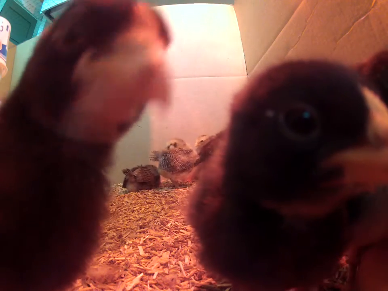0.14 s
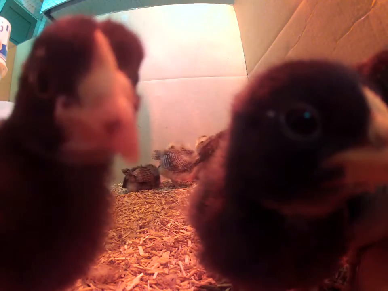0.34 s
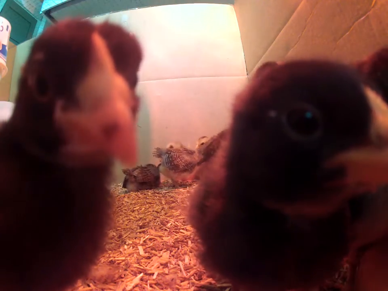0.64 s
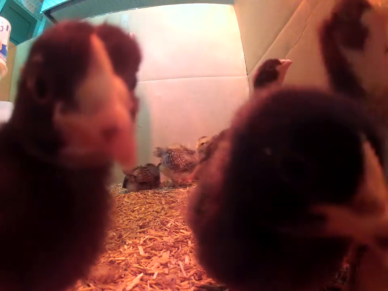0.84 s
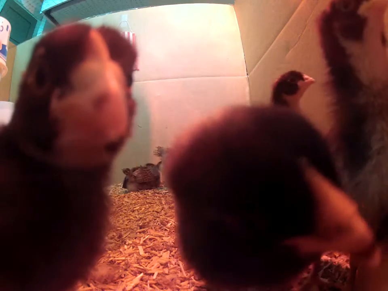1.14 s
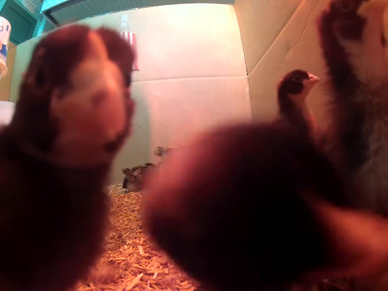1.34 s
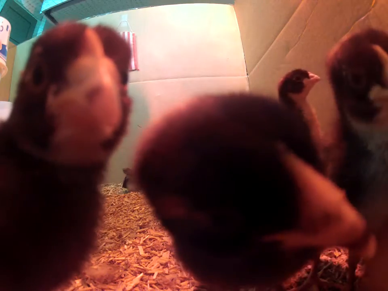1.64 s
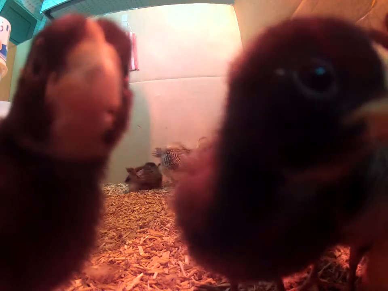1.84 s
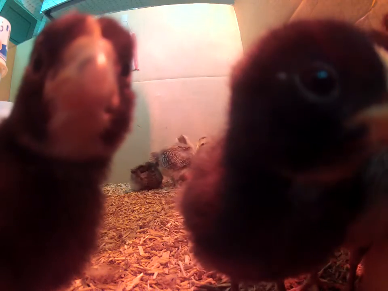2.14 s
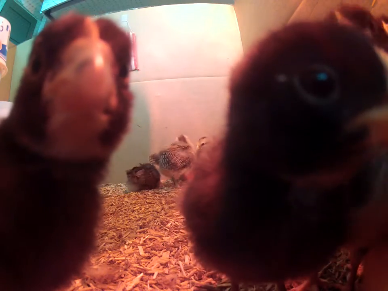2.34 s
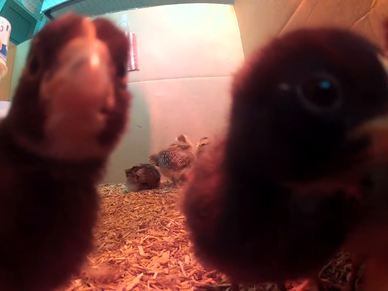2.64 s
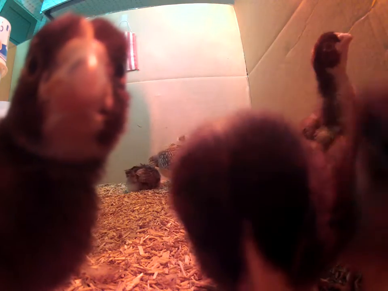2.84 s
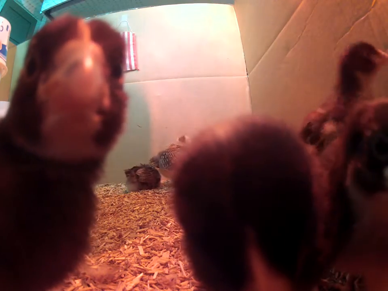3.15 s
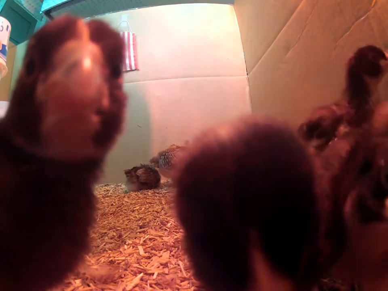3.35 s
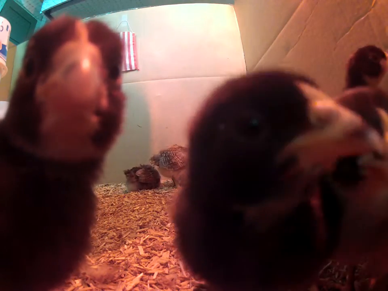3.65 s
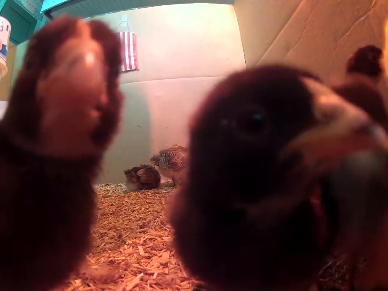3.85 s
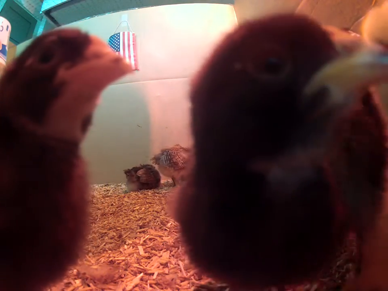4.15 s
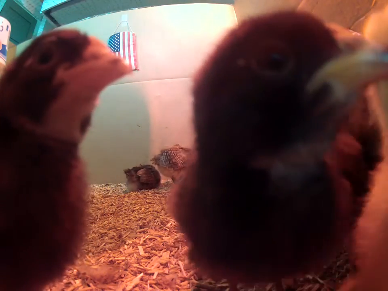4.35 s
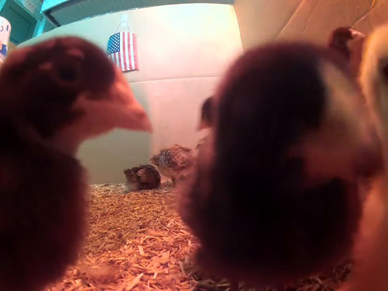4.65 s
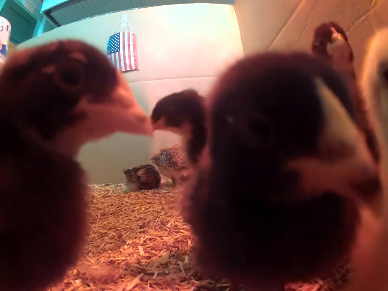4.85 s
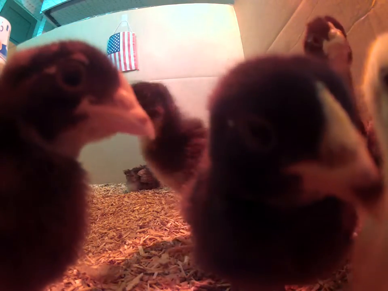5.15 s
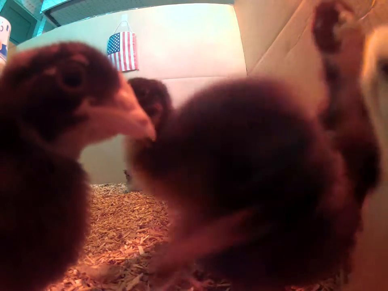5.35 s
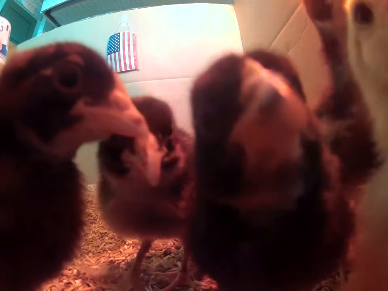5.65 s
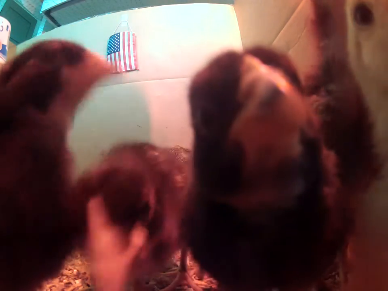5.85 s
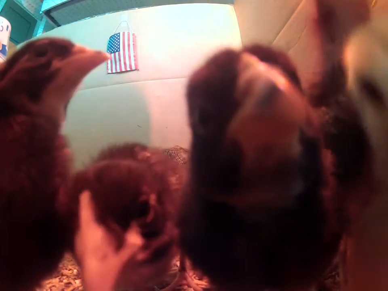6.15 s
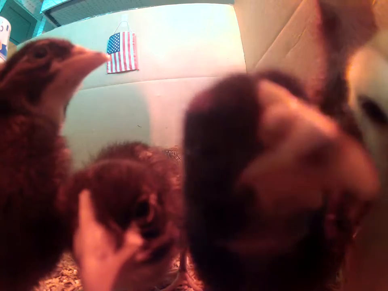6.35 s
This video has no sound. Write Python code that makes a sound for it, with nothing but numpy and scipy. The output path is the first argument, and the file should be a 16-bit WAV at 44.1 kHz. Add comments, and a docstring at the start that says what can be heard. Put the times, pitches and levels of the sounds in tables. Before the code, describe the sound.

Inside a cardboard brooder, young chicks peep beside a small camera whose low-grade microphone adds a gritty, metallic treble edge. Over a quiet low rumble and faint hiss, brief whistled cheeps of about a twentieth of a second rise or dip and then fall, with a short diffuse box echo. Soft scattered peeps open the first second. At 1.15 and 1.4 seconds beaks rap the casing: loud, hard, stuttering clicks with a hollow knock and low wobble, and a duller bump between at 1.3. After a lull, pecks return at 2.45, 2.93, 3.34 and, brightest, 3.6 seconds, among cheeps. From 3.7 to 4.7 the peeping thickens into a quick, overlapping flurry. It then quiets until sparse cheeps from 5.3, a faint tap near 5.55, and a tight cluster at 5.75 to 5.9, the last clearest. Light scuffling in shavings follows, then one weak peep at 6.4.

```python
"""Chicks crowding a camera in a brooder box

Young chicks in a cardboard box peep close to a small camera: near-sine whistles with a faint octave,
gliding through a turn in pitch. Beaks rap the case, ringing its resonances; shoves bump and wobble it.
Feet scuffle as bursts of grainy noise, noise echoes give the box, and a low room rumble lies beneath.
The camera samples at a low rate and holds each sample, so every sound has mirror images in the treble.
"""
import sys
import numpy as np
from scipy import signal
from scipy.fft import rfft, irfft
from scipy.io import wavfile
from scipy.ndimage import uniform_filter1d

SR = 44100
rng = np.random.default_rng(int(sys.argv[2]) if len(sys.argv) > 2 else 0)


def to_wav(sig):
    """Store sig (one row per channel, or 1-D mono) as 16-bit WAV at the path in sys.argv[1].

    Samples outside -1..1 are clipped; the rate is SR.
    """
    pcm = np.clip(np.atleast_2d(sig), -1, 1) * 32767
    pcm = np.round(pcm).astype(np.int16)
    wavfile.write(sys.argv[1], SR, pcm.T)  # frames by channels


N = 286650


def undb(db):
    """Turn decibels into an amplitude factor."""
    return 10 ** (np.asarray(db) / 20)


def peeps():
    """Near-sine whistles with a faint octave; returns the direct sound and the feed to the box."""
    # Chick calls. Each row: start in seconds, length in seconds, first pitch in Hz, share of the length
    # at which the glide turns, pitch at the turn in Hz, last pitch in Hz, level in dB,
    # growth from start to end in dB, box echo in dB relative to the call.
    calls = [(0.141, 0.046, 2920, 0.38, 3268, 2810, -42, 7, -10.5),
             (0.302, 0.042, 3260, 0.44, 3493, 2770, -44, 6, -9.5),
             (0.558, 0.034, 2750, 0.66, 2580, 2440, -71, -8, -18),
             (0.726, .027, 2800, 0.4, 2650, 2680, -74.5, -14, -12),
             (0.853, .048, 3540, 0.22, 4020, 2700, -50.5, 6, -5),
             (1.009, 0.036, 3630, 0.25, 3934, 2720, -49, 6, -7),
             (1.342, 0.063, 3170, 0.51, 2600, 2560, -59.5, -10, -12),
             (1.473, 0.04, 3080, 0.79, 2710, 2730, -48.5, 4, 1),
             (1.507, 0.035, 2950, 0.34, 3200, 2800, -58, -2, -17),
             (1.643, 0.051, 3146, 0.58, 2746, 2790, -46, 10, -12),
             (2.25, 0.048, 3088, 0.59, 2640, 2790, -54.5, 0, -6.5),
             (2.447, 0.048, 2930, 0.39, 3274, 2650, -38.5, -2.5, -13),
             (2.572, 0.053, 3220, 0.38, 3800, 2760, -42, 16, -10.5),
             (2.671, 0.043, 3830, 0.24, 3740, 2566, -50, 18.5, -7.5),
             (2.809, 0.057, 3570, 0.18, 4750, 2714, -51.5, 13.5, -4),
             (3.049, 0.056, 3245, 0.26, 4450, 2690, -50, 13.5, -3.5),
             (3.14, 0.043, 2910, 0.23, 2910, 2436, -54.5, -12, -7),
             (3.554, .038, 3166, 0.79, 2810, 2590, -44.5, -11.5, -19),
             (3.688, 0.066, 3186, 0.64, 2794, 3150, -38, -5.5, -13.5),
             (3.845, 0.058, 3213, 0.56, 2893, 3140, -42.5, 0, -11),
             (3.906, 0.052, 3080, 0.35, 3566, 2670, -46, 6.5, -11.5),
             (3.969, 0.048, 3380, 0.35, 4780, 2670, -47.5, -3, 1),
             (4.075, 0.027, 3100, 0.15, 3180, 2550, -51, 4.5, -9),
             (4.089, 0.052, 3800, 0.21, 4680, 2770, -47, -10, -4),
             (4.239, 0.041, 2790, 0.239, 3003, 2430, -49.5, -5, -5),
             (4.254, .072, 3615, 0.22, 4940, 2820, -46.5, -5, -3),
             (4.41, 0.064, 4750, 0.22, 5290, 2780, -53, -10, -4.5),
             (4.488, 0.062, 3170, 0.72, 2737, 2860, -42.5, -4.5, -16.5),
             (4.661, 0.057, 3120, 0.65, 2933, 2950, -45, 3, -15.5),
             (5.291, .048, 3240, .15, 3250, 2750, -60.5, 3, -1),
             (5.45, 0.039, 3464, 0.91, 3240, 3220, -57, -16, -1.5),
             (5.732, 0.058, 2950, 0.74, 2614, 2880, -49.5, -6, -16.5),
             (5.744, 0.048, 3310, .3, 3410, 2640, -46, -11.5, -10),
             (5.757, 0.062, 3545, .24, 3810, 3004, -41.5, -1, -8.5),
             (5.906, 0.068, 4000, 0.11, 3928, 3434, -35.5, -2.5, -14),
             (5.914, 0.051, 3210, 0.25, 3626, 2710, -44, -14, -11),
             (6.39, 0.05, 3420, .7, 3170, 3100, -59.5, -13, -5.5)]
    # A dip on the way to the microphone. Each row: pitch in Hz, gain in dB.
    whistle_colour = [(2500, 0.5), (3500, -1.5), (3850, -4), (4200, -19), (4700, -16.5), (5300, -14)]
    colour_hz, colour_db = np.transpose(whistle_colour)
    falter_db_per_khz, falter_at, falter_width = 1.5, 0.58, 0.13  # place and width in shares of the length
    arch_swell_db, sag_swell_db = 2.5, 7  # softening at both ends, stronger if the pitch sags
    attack_s, release_s = 0.0048, 0.0075
    octave_db, octave_db_per_khz = -26, -45  # steady octave up to a pitch of 2.75 kHz, and its slope above
    steady_hz_per_s = 13000  # the octave fades in glides faster than this
    muffle_share = 0.2  # part of a peep's level changes that the box hears; the rest is the bird's direction

    direct, feed = np.zeros(N), np.zeros(N)
    for start, length, first_hz, turn, turn_hz, last_hz, level_db, growth_db, echo_db in calls:
        i, u = int(start * SR), np.linspace(0, 1, int(length * SR))
        hz = glide(u, first_hz, turn, turn_hz, last_hz)

        # The voice falters past the top of a high arch.
        fall_khz = max(turn_hz - last_hz, 0) / 1000
        falter_db = falter_db_per_khz * fall_khz * np.exp(-((u - falter_at) / falter_width) ** 2)
        swell_db = arch_swell_db if turn_hz > first_hz else sag_swell_db
        db = level_db + growth_db * (u - 0.5) - swell_db * (2 * u - 1) ** 2 - falter_db
        edge = np.clip(np.minimum(u * length / attack_s, (1 - u) * length / release_s), 0, 1)

        phase = 2 * np.pi * np.cumsum(hz) / SR
        octave = undb(octave_db + octave_db_per_khz * np.maximum(hz / 1000 - 2.75, 0))
        octave /= 1 + (np.gradient(hz) * SR / steady_hz_per_s) ** 4
        whistle = np.sin(phase) + octave * np.sin(2 * phase)
        call = undb(np.interp(hz, colour_hz, colour_db)) * edge * whistle

        box_db = db.max() + muffle_share * (db - db.max()) + echo_db
        direct[i:i + len(u)] += call * undb(db)
        feed[i:i + len(u)] += call * undb(box_db)
    return direct, feed


def glide(u, first_hz, turn, turn_hz, last_hz):
    """Pitch eases into the turn and out of it again along arcs of a cosine."""
    # Radians of cosine before and after the turn; a deeper fall levels out more.
    onset_bend = 1.8
    close_bend = 0.51 + 0.9 * max(turn_hz - last_hz, 0) / 1000

    def arc(v, bend):
        """Cosine arc from 0 at the turn to 1 at the far end."""
        return (1 - np.cos(bend * v)) / (1 - np.cos(bend))

    before = (first_hz - turn_hz) * arc((turn - u) / turn, onset_bend)
    after = (last_hz - turn_hz) * arc((u - turn) / (1 - turn), close_bend)
    return turn_hz + np.where(u < turn, before, after)


def beak_taps():
    """A hard contact rings the shell in high ticks and lower knocks, and loose parts rattle."""
    # Beak contacts, first blows and rattling rebounds.
    # Each row: time in seconds, tick drive in relative dB, knock drive in relative dB.
    contacts = [(1.12, -58.5, -52.5), (1.1437, -16, -19.5), (1.1445, -3, -19), (1.1465, -10, -11),
                (1.1487, -23, -27), (1.2938, -52.5, -37), (1.2973, -64.5, -34), (1.4072, -4.5, -19.5),
                (1.408, -7, -14), (1.4098, -10.5, -21.5), (1.4162, -22, -22.5), (1.4184, -14.5, -25),
                (1.4207, -8.5, -16.5), (1.4225, -18, -31), (2.436, -10, -28), (2.4389, -15, -33.5),
                (2.4396, -17, -26.5), (2.4417, -19, -35), (2.4437, -20.5, -25), (2.4482, -31.5, -29),
                (2.929, -19, -38), (2.9325, -12.5, -17.5), (2.935, -26, -24), (2.9387, -21.5, -38),
                (2.9415, -10.5, -30), (2.951, -53, -45), (3.3385, -13, -24.5), (3.3412, -22.5, -22),
                (3.3434, -18, -33.5), (3.3497, -18, -35.5), (3.354, -34.5, -44), (3.5846, -14.5, -27),
                (3.5932, -31, -41), (3.5968, -2, -36.5), (3.5982, -5.5, -32.5), (4.387, -59, -75),
                (5.46, -53, -54), (5.5546, -33.5, -41.5), (5.883, -43.5, -49), (5.973, -52, -70),
                (6.132, -72, -55)]
    # Bright resonances of the case. Each row: frequency in Hz, relative level in dB, 60 dB decay in seconds.
    tick_modes = [(2550, -6, .009), (3015, -8, .008), (3630, -7, .012), (4250, -6, .010), (4700, 2, .006),
                  (5250, 0, .007)]
    # Duller resonances of the case. Each row: frequency in Hz, relative level in dB, 60 dB decay in seconds.
    knock_modes = [(645, -7, 0.018), (776, 0.5, .02), (1031.4, 5, 0.013), (1478, 3.5, 0.012),
                   (2400, -5.5, 0.0014)]
    contact_s, rattle_s = 0.0004, 0.004  # time constants of exponential decay
    scratch_share = 0.4  # random scratch in a contact, beside the clean first touch
    rattle_db = -11  # relative to the tick drive
    soft_samples_per_db = 1.1  # a contact with little tick is a soft one and its knock lasts longer

    t = np.arange(2048) / SR
    tick, knock, rattle = np.zeros((3, N))
    noises = rng.standard_normal((len(contacts), 2, len(t)))
    for (s, tick_db, knock_db), (hard, loose) in zip(contacts, noises):
        at = slice(int(s * SR), int(s * SR) + len(t))
        blow = hard * np.exp(-t / contact_s)
        blow *= scratch_share / np.sqrt(np.sum(blow ** 2))
        blow[0] += 1  # the clean first touch
        tick[at] += undb(tick_db) * blow

        soft = max(1, int(soft_samples_per_db * (knock_db - tick_db)))
        soft_blow = uniform_filter1d(blow, soft, origin=-(soft // 2), mode="constant") * np.sqrt(soft)
        knock[at] += undb(knock_db) * soft_blow
        rattle[at] += undb(tick_db + rattle_db) * loose * np.exp(-t / rattle_s)
    rattle = signal.sosfilt(signal.butter(2, 1500, "high", fs=SR, output="sos"), rattle)
    return undb(-3.5) * ring(tick, tick_modes) + undb(-10.5) * ring(knock, knock_modes) + rattle


def jolts():
    """Each shove bumps the whole camera and leaves it wobbling on its footing."""
    # Shoves at the camera. Each row: time in seconds, bump drive in relative dB, wobble drive in relative dB.
    shoves = [(1.117, -45, -61), (1.145, -31, -30.5), (1.2923, -32, -38.5), (1.408, -31, -40),
              (1.4202, -30, -34), (2.4357, -26.5, -40.5), (2.4431, -25.5, -33), (2.9334, -44, -38.5),
              (2.942, -47.5, -43.5), (3.3403, -53.5, -36), (3.3444, -34.5, -42), (3.5836, -52.5, -32),
              (3.5934, -23, -43), (3.5981, -21, -31), (5.5543, -52, -68), (5.743, -45, -73),
              (5.971, -47, -86), (6.054, -43, -73.5)]
    # Bump resonances. Each row: frequency in Hz, relative level in dB, 60 dB decay in seconds.
    bump_modes = [(178, -0.5, 0.013), (316.3, -4, 0.04), (530, -8, 0.061)]
    # Wobble resonances. Each row: frequency in Hz, relative level in dB, 60 dB decay in seconds.
    wobble_modes = [(75.94, -5, 0.13), (150.45, -3.5, 0.096), (98.4, -2.5, .25), (236, -8, 0.09)]
    push_s, shake_s = 0.00048, 0.02  # time constants of the push and of the shaking

    t = np.arange(2048) / SR
    push = t * np.exp(-t / push_s)
    push /= push.sum()
    bump, wobble = np.zeros((2, N))
    shakes = rng.standard_normal((len(shoves), len(t))) * np.exp(-t / shake_s)
    for (s, bump_db, wobble_db), shake in zip(shoves, shakes):
        at = slice(int(s * SR), int(s * SR) + len(t))
        bump[at] -= undb(bump_db) * push
        wobble[at] += undb(wobble_db) * (push + 0.37 * shake / np.sqrt(np.sum(shake ** 2)))
    wobble_band = signal.butter(2, [45, 500], "band", fs=SR, output="sos")
    swaying = signal.sosfilt(wobble_band, ring(wobble, wobble_modes))
    return undb(3.5) * ring(bump, bump_modes) + undb(-2) * swaying


def ring(x, modes):
    """Sum of decaying resonances, neighbours in opposite phase."""
    out = 0
    for k, (hz, db, t60) in enumerate(modes):
        pole = np.exp(2j * np.pi * hz / SR - np.log(1000) / (t60 * SR))
        resonance = signal.lfilter([1], [1, -pole], x).imag
        out = out + (-1) ** k * undb(db) * resonance
    return out


def box(x):
    """Diffuse echoes off the box walls: a strong early part, then a dense fading tail; unit energy."""
    box_t60_s = 0.49
    t = np.arange(int(SR * 0.8)) / SR
    tail = rng.standard_normal(len(t)) * np.exp(-np.log(1000) * t / box_t60_s)
    tail *= np.minimum(t / 0.0051, 1) * (1 + 1.3 * np.exp(-t / 0.028))
    return signal.fftconvolve(x, tail / np.sqrt(np.sum(tail ** 2)))[:N]


def scuffle():
    """Dense tiny crackles of dry shavings in uneven bursts, and the duller shifting of feet."""
    # Feet and down in the shavings.
    # Each row: start in seconds, hold in seconds, level in dB, fading in dB per second.
    shavings = [(1.12, .02, -61, 302.5), (1.15, .01, -65.5, 148.5), (1.43, .15, -71.5, 110),
                (2.95, 0.011, -55, 600.5), (3.35, 0.38, -74.5, 204.5), (3.553, 0.028, -59, 297.5),
                (3.6, .01, -53.5, 200), (3.7, 0.074, -73, 300), (4.39, 0.13, -68, 168), (5.3, .2, -82, 200),
                (5.555, .01, -54.5, 172.5), (5.7, 0.26, -72, 148), (6.06, 0.12, -68, 220)]
    # Feet shifting on the box floor, felt through the camera's footing.
    # Each row: start in seconds, hold in seconds, level in dB, fading in dB per second.
    shifting = [(1.125, .04, -60, 296), (1.297, 0.0048, -47, 698), (1.41, .04, -62.5, 160),
                (1.55, 0.059, -65.5, 250.5), (2.45, .02, -60.5, 240), (3.35, 0.096, -60.5, 400),
                (3.6, .03, -55, 294), (3.75, 0.018, -64.5, 401.5), (5.56, 0.0084, -65.5, 302.5),
                (5.7, .05, -63, 156.5), (6.04, .09, -69.5, 260.5)]
    # Spectrum of the shavings. Each row: frequency in Hz, relative level in dB per Hz.
    rustle = [(200, -9.5), (600, 1), (1500, -3.5), (3000, -1), (4500, 5), (5800, -3)]
    # Spectrum of the floor. Each row: frequency in Hz, relative level in dB per Hz.
    floor = [(60, -20), (150, -6), (350, 0.5), (700, -6.5), (1200, -15.5), (2500, -29.5)]
    rise_db_per_s, patchy_db = 1500, 2.5  # rise into a burst, and spread of its unevenness

    out, t = 0, np.arange(N) / SR
    for bursts, colour in ((shavings, rustle), (shifting, floor)):
        gain = 0
        for s, hold, db, fall in bursts:
            rise_db = rise_db_per_s * np.maximum(s - t, 0)
            fall_db = fall * np.maximum(t - s - hold, 0)
            gain = gain + undb(db - rise_db - fall_db)
        # Every grain of 16 samples has its own level.
        grain_gain = undb(rng.exponential(size=N // 16 + 1)).repeat(16)[:N]
        grains = rng.standard_normal(N) * grain_gain
        out = out + gain * undb(patchy_db * walk(44)) * coloured(grains, colour)
    return out


def air():
    """Low rumble that wavers over a steady hiss."""
    # Spectrum of the room air. Each row: frequency in Hz, relative level in dB per Hz.
    air_colour = [(15, -32), (22, -12), (70, -6), (200, -9), (430, -15.5), (750, -23.5), (1100, -27),
                  (2500, -31.5), (6000, -35)]
    noise = coloured(rng.standard_normal(N), air_colour)
    low = signal.sosfilt(signal.butter(2, 700, fs=SR, output="sos"), noise)
    waver = undb(0.5 * walk(3.7) + 1.0 * walk(30))
    return undb(-61.5) * (noise + (waver - 1) * low)


def coloured(x, table):
    """Shape x by a (Hz, dB) spectrum; rms 1."""
    hz, db = np.transpose(table)
    f = np.maximum(np.arange(len(x) // 2 + 1) * SR / len(x), 1)
    gain_db = np.interp(np.log(f), np.log(hz), db)
    y = irfft(rfft(x) * undb(gain_db), len(x))
    return y / y.std()


def walk(rate):
    """Slow random drift, spread 1: noise averaged twice over 1 / rate seconds."""
    k = int(SR / rate)
    w = uniform_filter1d(uniform_filter1d(rng.standard_normal(N), k), k)
    return w / w.std()


def scene():
    """Peeps, taps and jolts up close, their box echoes, the scuffling and the room air."""
    calls, feed = peeps()
    taps = beak_taps()
    echoes = box(feed + undb(-42) * taps)  # the box hears little of the taps
    return (calls + taps + jolts() + echoes + scuffle() + air())[None]


def record(dry):
    """Filter, sample at 12 kHz, round off overloads, hold each sample for four 48 kHz ticks, cut the top."""
    overload_level, hold_ticks = 0.62, 4
    fade_hz, top_hz = 15500, 16450
    x = signal.sosfilt(signal.butter(8, 5950, fs=SR, output="sos"), dry)
    slow = signal.resample_poly(x, 40, 147, axis=1, window=("kaiser", 8.))  # 44.1 to 12 kHz
    rounded = overload_level * np.tanh(slow / overload_level)
    stepped = rounded.repeat(hold_ticks, axis=1)  # the steps leave mirror images above 6 kHz
    held = signal.resample_poly(stepped, 147, 160, axis=1)[:, :N]  # 48 to 44.1 kHz
    faded = signal.sosfilt(signal.butter(10, fade_hz, fs=SR, output="sos"), held)
    return signal.sosfilt(signal.ellip(10, 0.2, 80, top_hz, fs=SR, output="sos"), faded)


dry = scene()
out = record(dry)
to_wav(out)
```